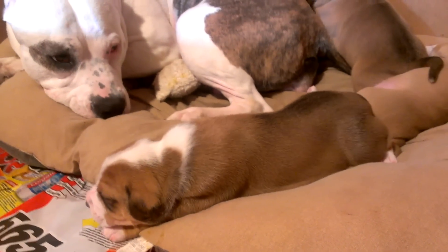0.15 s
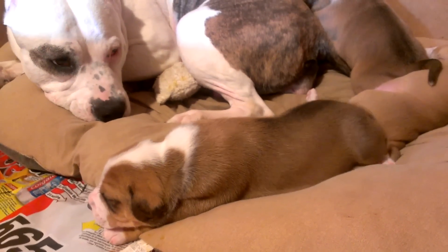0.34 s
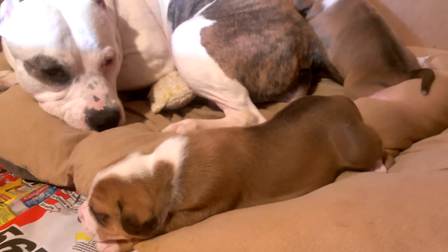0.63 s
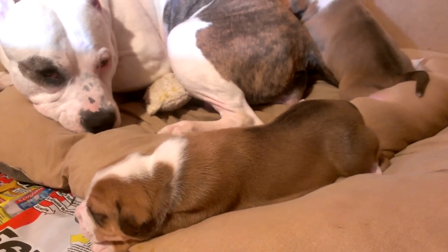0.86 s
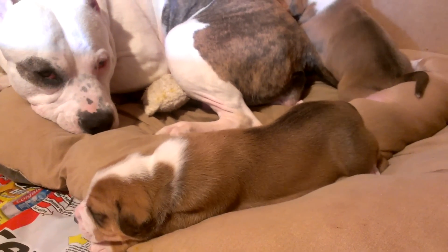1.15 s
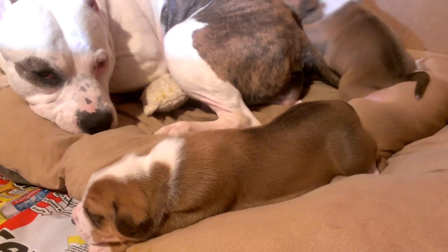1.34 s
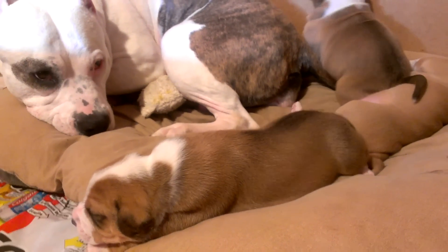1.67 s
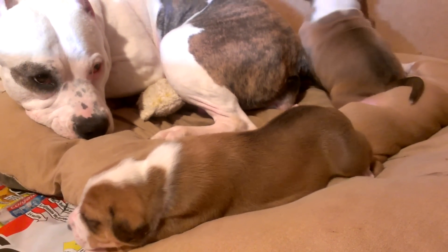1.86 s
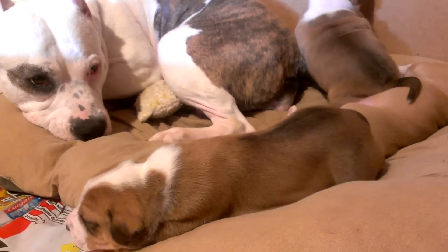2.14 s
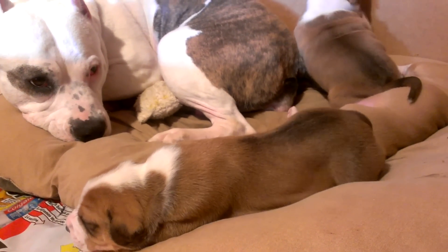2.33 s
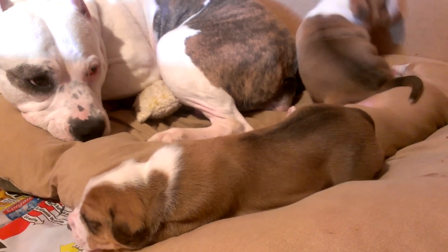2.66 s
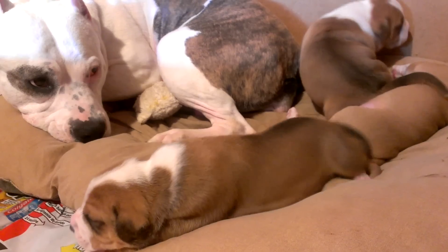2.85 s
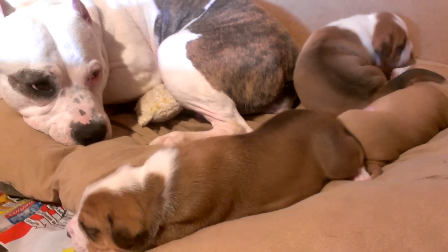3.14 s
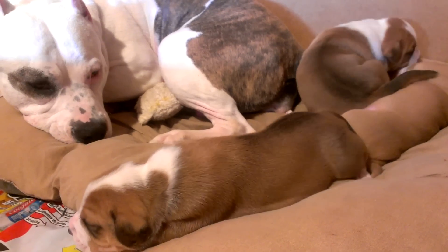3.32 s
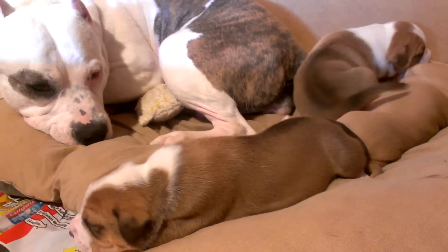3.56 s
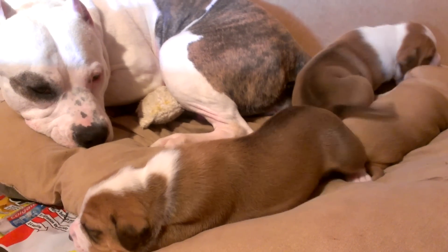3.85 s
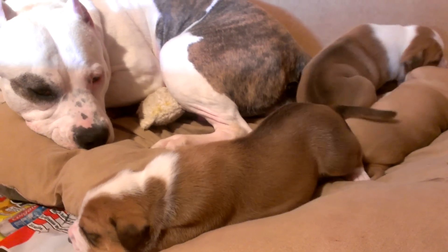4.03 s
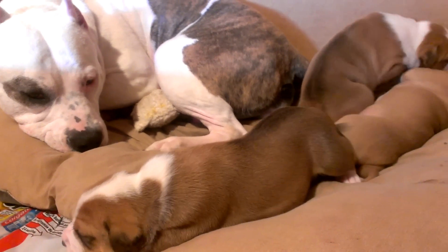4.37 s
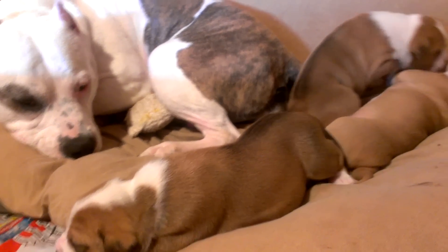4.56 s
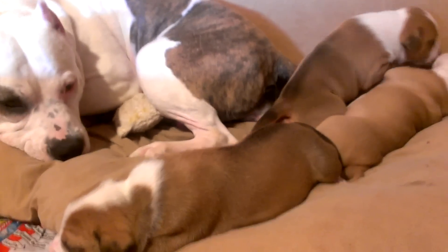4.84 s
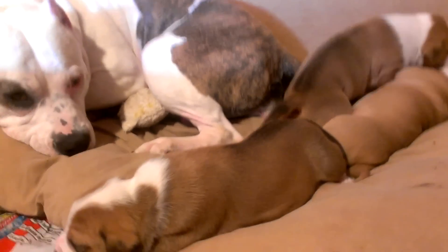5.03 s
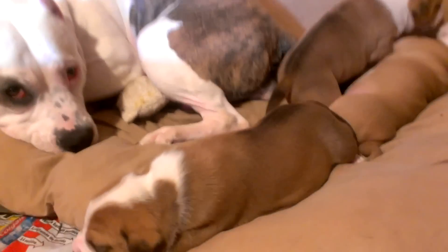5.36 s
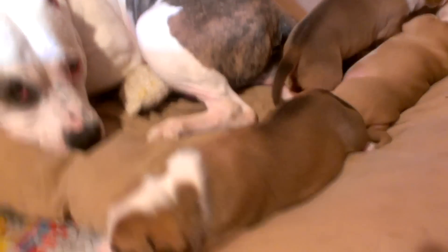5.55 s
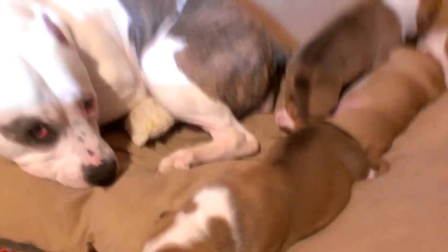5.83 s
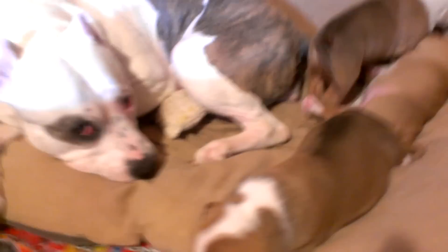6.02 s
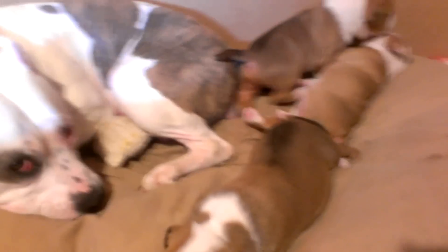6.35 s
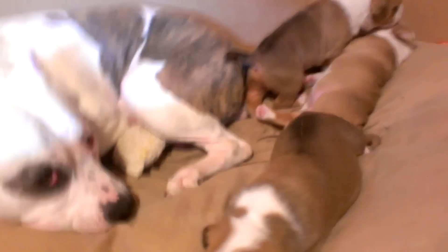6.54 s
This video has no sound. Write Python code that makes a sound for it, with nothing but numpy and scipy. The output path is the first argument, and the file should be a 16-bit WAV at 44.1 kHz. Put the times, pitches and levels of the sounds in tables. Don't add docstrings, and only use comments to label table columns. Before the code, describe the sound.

Two newborn puppies cry close to a hand-held stereo microphone in a small, short-decaying room, over faint hiss. A high cry is already sounding at 0 s, sinking and trembling until 0.4. A lower hoarse cry follows from 0.6 to 1.0, then a piercing wavering one from 1.2 to 1.8, a climbing one from 1.9 to 2.5 and a short falling one until 2.9. Tiny squeaks dot these, and a crisp tick lands near 1.8. From 3.2 to 4.6 come a low grunt and four short squeaks that break into rough tones, with very faint low throat rumbles from the mother around 3.4 and 3.8. Light ticks fall near 4.6; a clear chirp at 4.85. After a sparse gap, a soft whine comes at 5.4, a quick brush at 5.7, a breaking whine around 6, loud bedding drags at 6.2 to 6.3, and a last hoarse whine with a sharp rustle at 6.5.

```python
import sys
import numpy as np
from scipy import signal
from scipy.fft import rfft, irfft, next_fast_len
from scipy.io import wavfile
from scipy.ndimage import uniform_filter1d

SR = 44100
rng = np.random.default_rng(int(sys.argv[2]) if len(sys.argv) > 2 else 0)


def dump_mix(stems):
    frames = np.atleast_2d(stems).T
    limited = np.clip(frames, -1, 1)
    pcm = np.round(limited * 32767).astype(np.int16)
    wavfile.write(sys.argv[1], SR, pcm)


def elevation(decibels):
    levels = np.asarray(decibels, float)
    return 10 ** (levels / 20)


N = 295029

# f/Hz, level/dB [per Hz]
HISS = [(18, -30), (30, -48.5), (324, 4.5), (673, -6), (787, -3.5), (1200, -11.5), (4420, -12),
        (15500, -16)]
HISS_DB = -63.5
# f/Hz, level/dB
PORT_LEAN = [(60, 1.5), (150, -3.5), (380, -1.5), (950, -3), (2380, 0.5), (5980, 5), (15000, -2.5)]
# f/Hz, level/dB
MASK = [(100, -69.5), (500, -47.5), (2500, -73), (7000, -65), (15000, -69.5)]
# f/Hz, t60/s
ROOM = [(200, 0.26), (800, 0.29), (2000, 0.26), (6000, 0.24)]

# loudest t/s, level/dB, rise/s, fall/s [both over 20 dB]
RUSTLE = [
    (5.711, -34, .014, 0.0442),
    (5.74, -54.5, 0.069, 0.3),
    (5.857, -53, .06, 0.2),
    (6.081, -41.5, 0.22, 0.42),
    (6.204, -29, 0.055, 0.15),
    (6.309, -31, 0.084, 0.11),
    (6.444, -41, 0.036, 0.14),
    (6.534, -27.5, .03, .05),
    (6.659, -44.5, .07, 0.23),
]
# f/Hz, level/dB [per Hz]
CLOTH = [(170, -25), (350, -12.5), (1400, -6.5), (3000, -2.5), (4300, 1), (6000, -2), (8500, -11.5),
         (15500, -19)]
# t/s, peak level/dB, ring f/Hz
TICKS = [(1.815, -37.5, 1300), (1.834, -23.5, 1465), (1.851, -37, 2800), (2.564, -39.5, 2500),
         (2.96, -55, 1923), (4.552, -34, 1200), (4.685, -33, 1000), (5.434, -42.5, 1980),
         (5.587, -44.5, 1930), (5.672, -41, 2500), (5.71, -59, 3630), (5.737, -52.5, 4030),
         (5.756, -49, 3610)]
# start t/s, end t/s, pulse rate/Hz, peak level/dB
RUMBLE = [
    (3.389, 3.588, 37, -48.5),
    (3.749, 3.9, 46, -46.5),
]
# f/Hz, level/dB, t60/s
CHEST = [(237, -7, 0.075), (510, -2, 0.04), (850, -37, .03)]

# f/Hz, level/dB
THROAT = [(180, -22.5), (300, -0.5), (598, -7), (814, 23), (1080, -6.5), (1850, 9), (2210, -17.5),
          (2630, -28), (3180, -31), (4270, -19.5), (5600, -21.5), (6700, -38.5), (10000, -62),
          (22000, -120)]
# f/Hz, level/dB
CRY_VOICE = [(500, -16.5), (650, -9), (800, -2), (1250, -3.5), (1600, -1), (1930, -0.5), (2300, -27),
             (2800, -13)]
# f/Hz, level/dB [per Hz]
RASP = [(150, -20), (280, -7.5), (800, 5.5), (1100, -12.5), (1700, -1.5), (2600, -25.5), (4000, -35.5),
        (9000, -40.5)]
# f/Hz, level/dB [per Hz]
RASP_TOP = [(3000, -37), (4200, -5.5), (5600, 3.5), (7000, -20.5), (8300, -8.5), (10500, -49.5)]
TOP_HZ = 3600
HALF_SLOPE_DB = 10
HALF_UNDER_DB = -7

# start t/s, length/s, pitch f/Hz, peak level/dB, roughness [0-1]
SQUEAKS = [
    (.38, 0.077, 921, -35, 0.4),
    (.63, 0.083, 860, -29, .5),
    (.93, 0.048, 715.5, -28, 0.22),
    (1.115, .085, 823.5, -34.5, .85),
    (2.47, .12, 839, -31, .3),
    (6.47, .12, 832, -38, 0.94),
]
# start t/s, length/s, pitch f/Hz, peak level/dB, roughness [0-1]
YIPS = [
    (1.44, .11, 789.4, -45, .3),
    (1.81, .06, 736, -57.5, .86),
    (2.652, .09, 778.5, -43, .5),
    (5.45, .115, 792, -51, .55),
]
# start t/s, length/s, pitch f/Hz, peak level/dB, roughness [0-1]
GRUNTS = [
    (3.158, .082, 610, -44, .25),
    (5.118, .062, 601.4, -55, .3),
]
# start t/s, length/s, pitch f/Hz, peak level/dB, roughness [0-1]
CHIRPS = [
    (4.84, .062, 790, -30, .08),
    (5.96, .09, 790, -37, .35),
]
# share of length, pitch factor, level/dB
ARCH = [(0, 0.94, -14.5), (.3, 1.0, -0.5), (.7, 1.01, -3), (1, 0.82, -17.5)]
# share of length, pitch factor, level/dB
SWELL = [(0, .86, -17), (.35, .97, -6), (.75, 1.02, 0), (1, 1.03, -8)]
SHUT_DB, OPEN_DB, LOW_DB, CLEAR_DB = (-13.5, -38), (4, -19), (-9.5, 8), (-12, -30)

# start t/s, broken part/s, peak level/dB, clear pitch f/Hz, broken pitch f/Hz
HICCUPS = [
    (3.622, 0.079, -34, 787, 619),
    (3.905, .098, -34, 871, 772.4),
    (4.218, 0.066, -36.5, 802.5, 790),
    (4.515, .055, -37.5, 828, 852.5),
]
CLEAR_S, ONSET_S, BREAK_S = .036, .014, .014
SCOOP, CLIMB = 0.82, 1.06
CLEAR_ROUGH, BROKEN_ROUGH = .07, 0.45

# t/s, pitch f/Hz, effort level/dB, mouth opening [top band level/dB under effort], roughness [0-1]
CRY_SINKING = [(0.0, 1154, -23.5, -25, 0.05), (.035, 984, -28.5, -19, 0.1), (.105, 951.4, -27, -26.5, 0.08),
               (.165, 839, -26, -36.5, 0.04), (.21, 829, -27, -33, 0), (.352, 850, -27, -36, 0.05),
               (.41, 870.5, -29, -31, 0.09)]
CRY_HOARSE = [(.6, 564.5, -55.5, -26, .7), (.65, 583, -34, -45, 0.54), (.715, 580.2, -29, -37, 0.39),
              (.78, 541, -27, -41, .19), (.82, 585, -29, -39.5, .15), (.87, 605, -28, -40.5, .15),
              (.965, 589, -37.5, -48, 0.31), (1.0, 565, -56, -30, 0.21)]
CRY_HIGH = [(1.16, 1092, -43, -29, 0.33), (1.2, 1079, -36.5, -29, .25), (1.245, 884, -27, -39.5, 0.1),
            (1.3, 917.6, -27.5, -28, .1), (1.41, 900.5, -26.5, -21, .13), (1.47, 1055, -29, -15, 0.14),
            (1.6, 1121, -27.5, -22.5, .04), (1.742, 1123, -26.5, -18, 0.024), (1.77, 880, -34, -29, 0.3)]
CRY_CLIMBING = [(1.92, 458, -39.5, -26.5, .6), (1.95, 476.4, -28, -41.5, .35),
                (1.994, 560.5, -28.5, -35.5, 0.09), (2.034, 523.2, -29, -37, .07),
                (2.12, 534, -29, -30, .07), (2.175, 588.6, -28, -38, .06), (2.31, 604.4, -26.5, -27, .04),
                (2.378, 736.7, -25, -23.5, 0.039), (2.49, 765.4, -24.5, -26, 0.022)]
CRY_FALLING = [(2.67, 608.6, -42.5, -28, .2), (2.71, 646, -31, -26, .08), (2.745, 629, -30, -20.5, .12),
               (2.79, 522, -29, -21, .15), (2.835, 442.3, -27, -17.5, .3), (2.88, 433, -40, -22, 0.58)]
WHINE_SOFT = [(5.4, 794, -51, -28, 0.12), (5.438, 1008, -43.5, -10.5, .1), (5.53, 1022, -37, -19.5, .1),
              (5.575, 954, -46, -25, 0.16)]
WHINE_BROKEN = [(5.92, 818, -38, -30, 0.12), (5.95, 1009, -38, -15.5, 0.092), (5.99, 1084, -35, -24, .16),
                (6.035, 1047, -31.5, -19, .18), (6.066, 948.6, -30, -16.5, .2),
                (6.108, 888.4, -31.5, -36, 0.34), (6.145, 859, -31, -32, 0.3)]
WHINE_LAST = [(6.43, 790.5, -40, -25, 0.09), (6.45, 899, -35, -26, 0.091), (6.518, 959, -35.5, -40, .5),
              (6.59, 914, -41, -21, .5)]
# curve, tilt level/dB [per octave], third harmonic level/dB
CRYING = [(CRY_SINKING, 0.6, -4), (CRY_HOARSE, -7, 1.5), (CRY_HIGH, -9.5, 3.6),
          (CRY_CLIMBING, 0.4, .4), (CRY_FALLING, -9.5, 1.7), (WHINE_SOFT, -5.5, -10),
          (WHINE_BROKEN, -7, -9), (WHINE_LAST, -11, -6)]
# start t/s, end t/s, half-pitch line level/dB under effort
BREAKS = [(0.624, 0.697, -8), (0.723, 0.841, -30.5), (1.15, 1.192, -10), (1.91, 1.945, -19.5),
          (1.445, 1.55, -28), (2.69, 2.719, -19.5), (2.78, 2.85, -16), (6.069, 6.133, -8),
          (6.554, 6.6, -4.5)]
STEADY_HALF_DB, BREAK_DB_PER_S = -44.5, 2500
# start t/s, end t/s, turn rate/Hz, share of pitch
TRILLS = [
    (0.031, 0.119, 30, 0.022),
    (1.25, 1.471, 28, 0.041),
]
TRILL_EDGE_S = .03
REST_HZ, THROAT_FOLLOWS = 692, 0.39


def evened(x):
    return x / np.sqrt(np.mean(x ** 2) + 1e-20)


def read(points, hz):
    f, value = np.transpose(points)
    return np.interp(np.log(hz + 1), np.log(f + 1), value)


def add(mix, s, sound):
    part = mix[round(s * SR):][:len(sound)]
    part += sound[:len(part)]


def colour(x, points, share=1):
    size = next_fast_len(x.shape[-1], real=True)
    gain = elevation(share * read(points, np.fft.rfftfreq(size, 1 / SR)))
    return irfft(rfft(x, size) * gain, size)[..., :x.shape[-1]]


def chance(size):
    return rng.standard_normal(-(-size // 4096) * 4096)[:size]


def wander(size, smooth_s):
    width = max(round(smooth_s * SR), 2)
    return evened(uniform_filter1d(uniform_filter1d(chance(size), width), width))


def noise(points, same, patchy_db):
    frames, hz = N // 128 + 5, np.fft.rfftfreq(512, 1 / SR)
    a, b, c, d, patches = rng.standard_normal((frames, 257, 5)).T
    patches = uniform_filter1d(patches, size=8, axis=0)
    patches = evened(uniform_filter1d(patches, size=10, axis=1))
    left = a + 1j * b
    right = same * left + np.sqrt(1 - same ** 2) * (c + 1j * d)
    z = np.array([left, right]) * elevation(read(points, hz)[:, None] + patchy_db * patches)
    return evened(signal.istft(z, nperseg=512, noverlap=384)[1][:, :N])


def room(x):
    places = np.arange(150, SR // 2, 20)
    taps = np.zeros((2, SR // 2 + 20))
    at = places + rng.integers(0, 20, (2, len(places)))
    np.put_along_axis(taps, at, rng.choice([-1., 1.], at.shape), 1)
    hz, t, z = signal.stft(taps, SR, nperseg=256)
    decay = elevation(-60 * t / read(ROOM, hz)[:, None])
    decay = decay * (1 + np.exp(-t / 0.01))
    tail = signal.istft(z * decay, SR, nperseg=256)[1]
    tail = signal.lfilter([1, -1], [1, -.8], tail)
    return signal.fftconvolve(x[None], tail / np.linalg.norm(tail[0]), axes=1)[:, :N]


def rustle():
    t = np.arange(N) / SR
    power = np.zeros(N)
    for s, db, rise, fall in RUSTLE:
        power += elevation(db - 20 * np.maximum((s - t) / rise, (t - s) / fall)) ** 2
    flicker = elevation(4.0 + 0.46 * wander(N, 0.0059))
    return np.sqrt(power) * flicker * noise(CLOTH, same=0.34, patchy_db=2.5)


def mother():
    out, t = np.zeros(N), np.arange(3000) / SR
    pulse = sum(elevation(g - 60 * t / t60) * np.sin(2 * np.pi * hz * t) for hz, g, t60 in CHEST)
    for start, end, per_s, db in RUMBLE:
        late, size = rng.standard_normal((20, 2)).T
        times = start + (np.arange(20) + 0.092 * late) / per_s
        for s, swing in zip(times, size):
            add(out, s, (s < end) * elevation(db + 2.8 * swing) * pulse)
    return out


def ticks():
    out, t = np.zeros(N), np.arange(-200, 1300) / SR
    for s, db, hz in TICKS:
        ring = [(hz / 2.5, -22.0), (hz, 0), (hz * 2.2, -4.0), (hz * 4.0, -45.0), (hz * 8.0, -80.0)]
        hit = rng.standard_normal(len(t)) + 9.0 * (t == 1 / SR)
        crack = colour(hit * (t > 0) * elevation(-60 * t / 0.026), ring)
        add(out, s + t[0], elevation(db) * crack / abs(crack).max())
    return out


def call(rows, hoarse, jitter, breath_db):
    s, *columns = np.transpose(rows)
    t = np.arange(s[0], s[-1], 1 / SR)
    hz, first_db, second_db, half_db, *upper = (np.interp(t, s, c) for c in columns)
    third_db, top_db = upper or (second_db - 11.5, second_db - 17.5)
    rough = np.clip(np.interp(t, *np.transpose(hoarse)), 0, 1)
    waver = (.003 + .06 * rough) * wander(len(t), .012)
    turns = np.cumsum(hz * (1 + jitter * rough * wander(len(t), .002) + waver)) / SR

    k = np.arange(1, 25)[:, None] / 2
    throat_db = read(THROAT, k * hz)
    throat_db -= 18 * np.exp(-((k * hz - 4350) / 480) ** 2)
    level_db = np.minimum(throat_db - throat_db[5], -8) + third_db
    top = k * hz > TOP_HZ
    top_sum_db = 10 * np.log10((top * elevation(2 * throat_db))[1::2].sum(0))
    level_db = np.where(top, throat_db + top_db - top_sum_db, level_db)
    under_db = throat_db - throat_db[0] - HALF_SLOPE_DB * np.log2(2 * k)
    half_lines_db = np.minimum(under_db, HALF_UNDER_DB * (k > 1)) + half_db
    level_db[::2] = half_lines_db[::2]
    level_db[1], level_db[3], level_db[5] = first_db, second_db, third_db

    noisy = np.clip(1.7 * rough + .05, 0, .95)
    drifts = np.array([wander(len(t), .01) for _ in range(6)])
    flutter_db = (1.2 + 3.0 * rough + .6 * k) * drifts[np.arange(24) % 6]
    gain = elevation(level_db + flutter_db) * np.where(top, np.sqrt(1 - noisy), 1)
    tone = np.sqrt(2) * (gain * np.cos(2 * np.pi * k * turns + k ** 2)).sum(0)

    puffs = (0.1 + np.exp(-(turns / 2 % 1) / 0.12)) * chance(len(t))
    effort = np.sqrt((elevation(level_db) ** 2).sum(0))
    air = elevation(breath_db) * rough * effort * evened(colour(puffs, RASP))
    air += elevation(top_db) * np.sqrt(noisy) * evened(colour(puffs, RASP_TOP))
    fade_in = t - t[0] + (s[0] == 0)
    edge = np.clip(np.minimum(fade_in, t[-1] - t) / .01, 0, 1)
    return s[0], (tone + air) * edge


def squeak(start, length, hz, db, rough, over_db, shape):
    octave_db, half_db = over_db
    rows = [(start + u * length, hz * bend, db + g, db + g + octave_db, db + g + half_db)
            for u, bend, g in shape]
    return call(rows, [(start, rough)], jitter=.08, breath_db=-3.0)


def hiccup(start, broken, db, hz, low_hz):
    slip, low_db = start + CLEAR_S, db + read(CRY_VOICE, low_hz)
    rows = [(start, hz * SCOOP, db - 13, db - 31, db - 43),
            (start + ONSET_S, hz * .97, db - 4, db - 16, db - 37),
            (slip - BREAK_S / 2, hz, db - 0.4, db - 10.5, db - 29),
            (slip + BREAK_S / 2, low_hz, low_db + 1.5, db - 22, db + 0.31),
            (slip + .6 * broken, low_hz * CLIMB, low_db + 4.5, db - 13, db - 6),
            (slip + broken, low_hz * CLIMB, low_db - 3, db - 31, db - 28)]
    hoarse = [(slip - BREAK_S, CLEAR_ROUGH), (slip + BREAK_S, BROKEN_ROUGH)]
    return call(rows, hoarse, jitter=.08, breath_db=0.0)


def cry(curve, tilt_db, third_db):
    s, *columns = np.transpose(curve)
    t = np.linspace(s[0], s[-1], num=200)
    hz, effort_db, mouth_db, rough = (np.interp(t, s, c) for c in columns)
    for a, b, per_s, share in TRILLS:
        depth = share * np.clip(np.minimum(t - a, b - t) / TRILL_EDGE_S, 0, 1)
        hz = hz * (1 + depth * np.sin(2 * np.pi * per_s * (t - a)))
    k = np.arange(1, 4)[:, None]
    low_db = read(CRY_VOICE, k * hz / (hz / REST_HZ) ** THROAT_FOLLOWS)
    low_db = low_db + tilt_db * np.log2(k) + third_db * (k == 3)
    low_db = low_db + effort_db - 10 * np.log10((elevation(low_db) ** 2).sum(0))
    broken = [db + BREAK_DB_PER_S * np.minimum(np.minimum(t - a, b - t), 0) for a, b, db in BREAKS]
    half_db = effort_db + np.maximum(np.max(broken, axis=0), STEADY_HALF_DB)
    rows = np.transpose([t, hz, low_db[0], low_db[1], half_db, low_db[2], effort_db + mouth_db])
    return call(rows, np.transpose([t, rough]), jitter=0.1, breath_db=-12.0)


def pups():
    out = np.zeros(N)
    calls = [cry(*c) for c in CRYING] + [hiccup(*h) for h in HICCUPS]
    kinds = [(SQUEAKS, SHUT_DB, ARCH), (YIPS, OPEN_DB, ARCH), (GRUNTS, LOW_DB, SWELL), (CHIRPS, CLEAR_DB, SWELL)]
    for table, over_db, shape in kinds:
        calls += [squeak(*row, over_db, shape) for row in table]
    for s, sound in calls:
        add(out, s, sound)
    return out


def scene():
    near = pups() + mother() + ticks()
    return near + elevation(1.5) * room(near) + rustle()


def masked(x):
    hz, t, z = signal.stft(x, SR, nperseg=2048, noverlap=1536)
    power = (abs(z) ** 2).mean(0)
    band_db = 10 * np.log10(uniform_filter1d(power, size=12, axis=0) / power.sum(0) + 1e-20)
    keep = np.clip((band_db - read(MASK, hz)[:, None]) / 9.0, 0, 1)
    return signal.istft(z * keep, SR, nperseg=2048, noverlap=1536)[1][:, :N]


def top_cut(x):
    return signal.sosfilt(signal.butter(12, 16210, fs=SR, output="sos"), x)


def record(dry):
    low_cut = signal.butter(3, 170., "high", fs=SR, output="sos")
    cut = signal.sosfilt(low_cut, dry)
    cut = cut + elevation(HISS_DB + 1.0) * noise(HISS, same=0.64, patchy_db=3.0)
    ports = np.array([colour(cut[0], PORT_LEAN, .5), colour(cut[1], PORT_LEAN, -.5)])
    return top_cut(masked(ports))


dry = scene()
out = record(dry)
dump_mix(out)
```